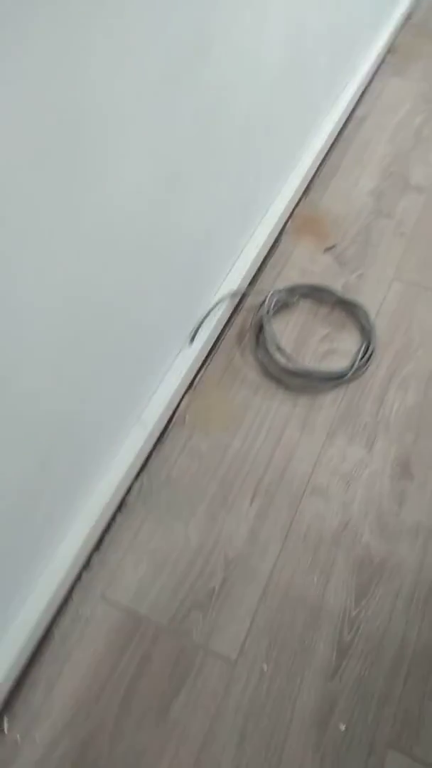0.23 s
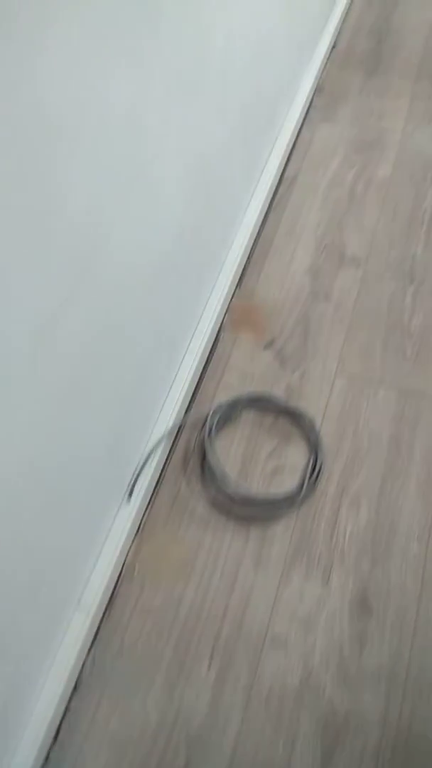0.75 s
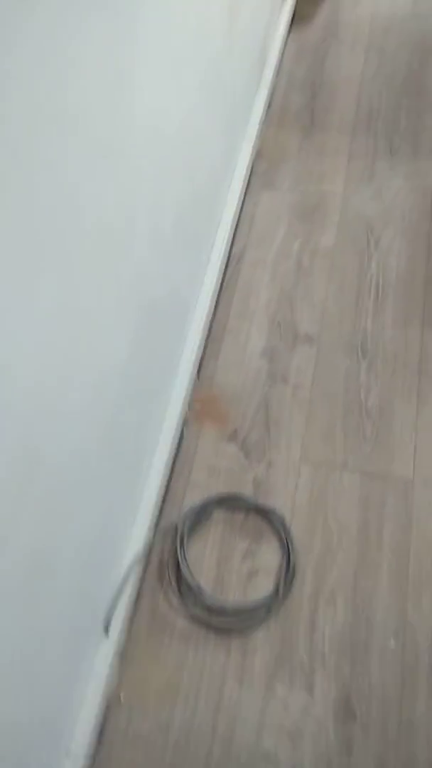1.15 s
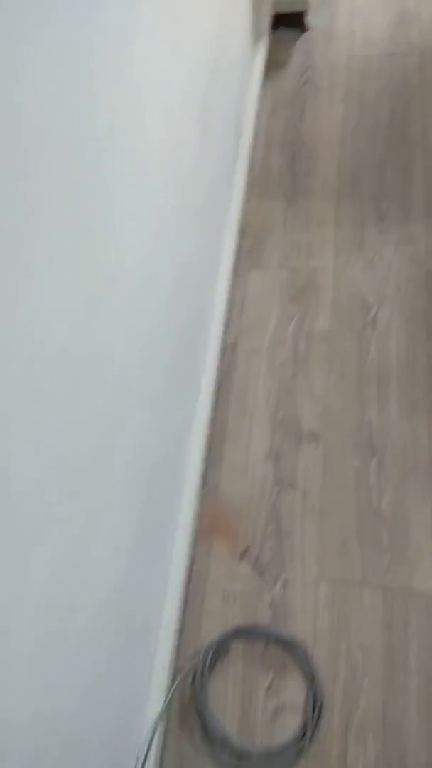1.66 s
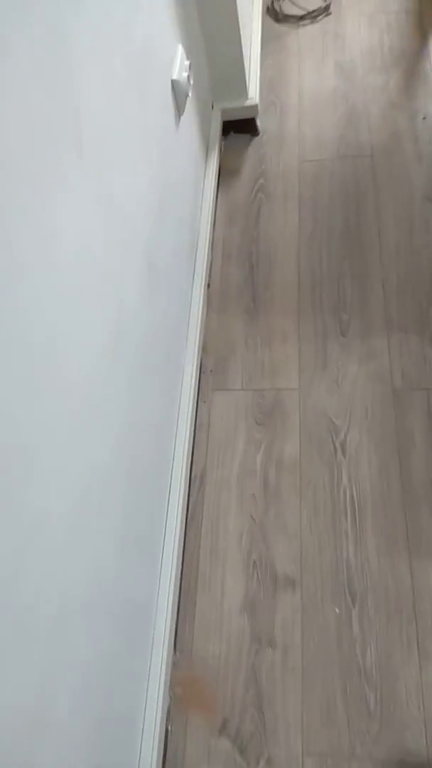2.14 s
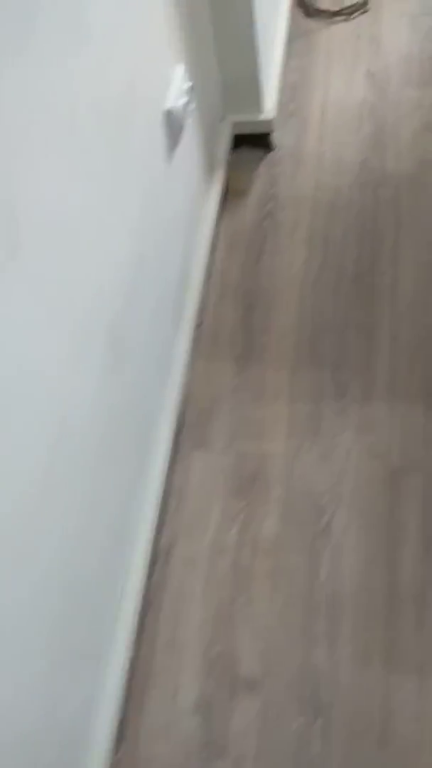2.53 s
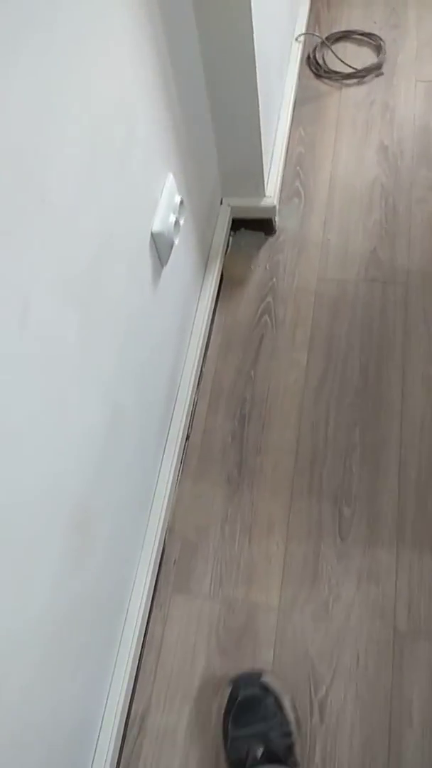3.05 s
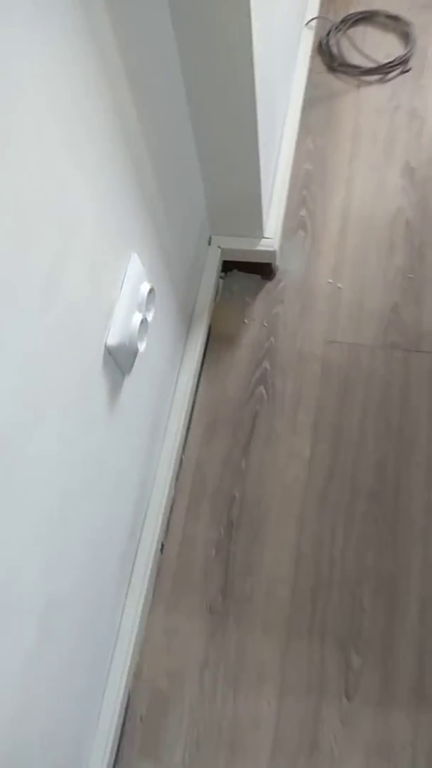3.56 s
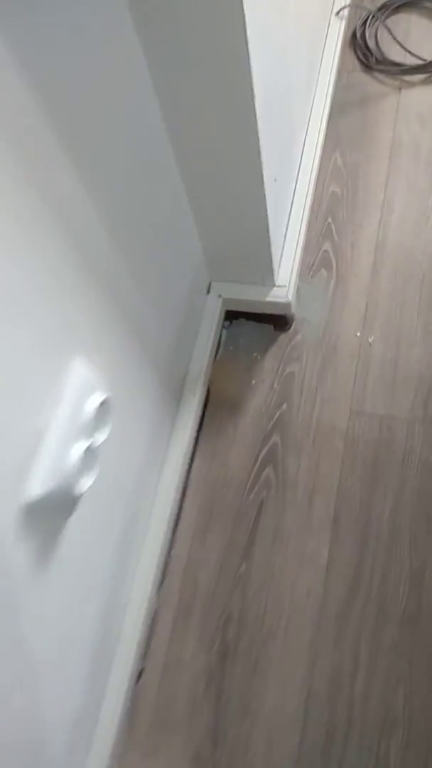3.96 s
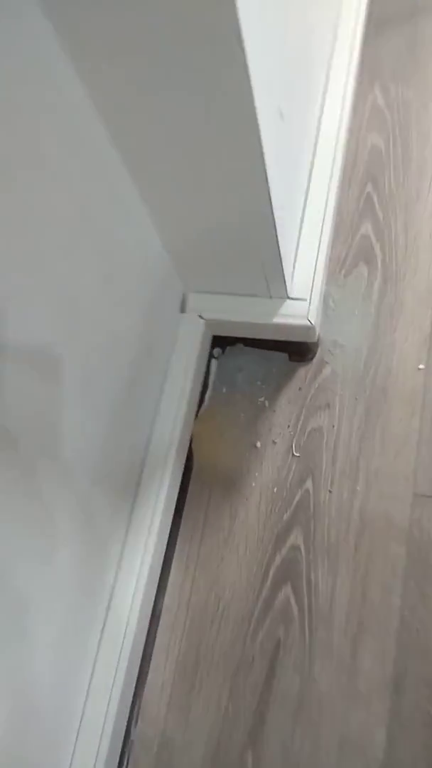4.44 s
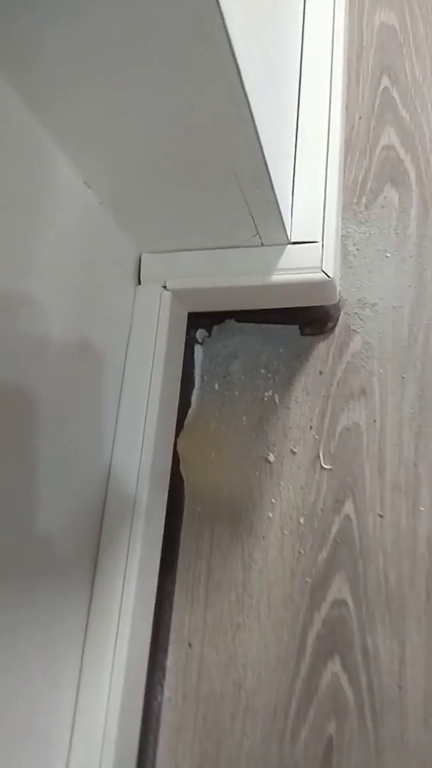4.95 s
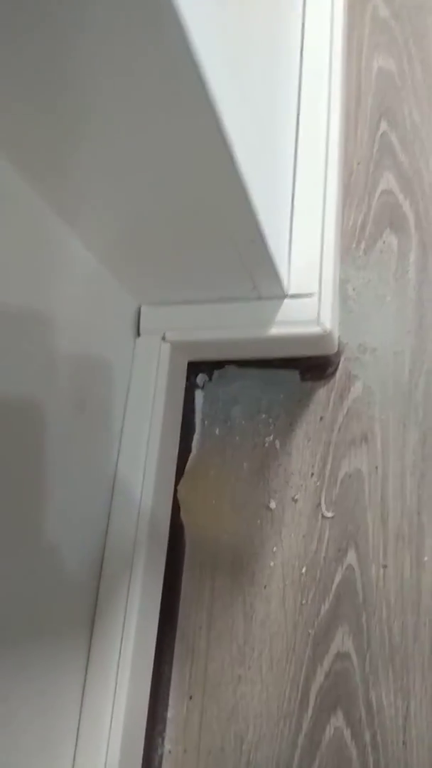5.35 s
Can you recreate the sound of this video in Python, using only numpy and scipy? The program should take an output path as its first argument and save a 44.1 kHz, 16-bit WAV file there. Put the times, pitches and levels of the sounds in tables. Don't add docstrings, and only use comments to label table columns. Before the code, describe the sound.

Slow soft-soled footsteps knock on a hollow laminate floor, with grit snapping underfoot, cloth rustling and a low rumble in a bare room.

```python
import sys
import numpy as np
from scipy import signal
from scipy.fft import rfft, irfft, next_fast_len
from scipy.io import wavfile
from scipy.ndimage import uniform_filter1d

SR = 44100
rng = np.random.default_rng(int(sys.argv[2]) if len(sys.argv) > 2 else 0)


def magnitude_from_level(level_db):
    exponent = np.asarray(level_db, float) / 20
    return 10 ** exponent


def wav_out(sig):
    wavfile.write(sys.argv[1], SR, np.round(np.clip(np.atleast_2d(sig).T, -1, 1) * 32767).astype(np.int16))


N = 246632
TIME = np.arange(N) / SR
PORT_LAG = 12


def on_log(table, hz):
    table_hz, value = np.transpose(table)
    return np.interp(np.log(np.maximum(hz, 1)), np.log(table_hz), value)


def shape(x, gain_at):
    size = next_fast_len(x.shape[-1])
    gain = gain_at(np.fft.rfftfreq(size, 1 / SR))
    return irfft(rfft(x, size) * gain, size)[..., :x.shape[-1]]


def unit(x):
    return x / np.sqrt(np.mean(x ** 2))


def highpass(x, order, hz):
    return signal.sosfilt(signal.butter(order, hz, "high", fs=SR, output="sos"), x)


# pitch_hz, likeness (-1 to 1)
PORT_LIKENESS = [(60, 0.57), (130, 0.98), (290, 0.76), (640, 0.19), (1410, -0.22), (3100, 0.037),
                 (6820, -0.046), (15000, 0.18)]


def diffuse(size):
    def like(hz):
        return np.clip(on_log(PORT_LIKENESS, hz), -.99, .99)
    mid = shape(rng.standard_normal(size), lambda hz: np.sqrt((1 + like(hz)) / 2))
    side = shape(rng.standard_normal(size), lambda hz: np.sqrt((1 - like(hz)) / 2))
    return np.array([mid + side, mid - side])


def coloured(x, table):
    return unit(shape(x, lambda hz: magnitude_from_level(on_log(table, hz))))


def walk(rate_hz):
    hold = int(SR / rate_hz)
    stairs = np.repeat(rng.standard_normal(N // hold + 1), hold)
    return unit(uniform_filter1d(uniform_filter1d(stairs, hold), hold)[:N])


def swell(peak_s, hold_s, rise_db_per_s, fall_db_per_s):
    t = np.arange(N * 1000 // SR + 1) / 1000 - peak_s
    return magnitude_from_level(rise_db_per_s * np.minimum(t, 0) - fall_db_per_s * np.maximum(t - hold_s, 0)) ** 2


def slow(power):
    return np.interp(TIME * 1000, np.arange(len(power)), power)


def patchy(x):
    z = signal.stft(x, nperseg=1024)[2]
    rows, columns = z.shape[-2:]
    field = rng.standard_normal((rows // 3 + 1, columns // 3 + 1))
    field = np.kron(field, np.ones((3, 3)))[:rows, :columns]
    gain = unit(magnitude_from_level(4 * np.minimum(field, 1.6)))
    return signal.istft(z * gain, nperseg=1024)[1][..., :N]


def add(out, x, s, pan_db=0):
    for port, lag, lean in ((0, 0, 0.53), (1, PORT_LAG, -5.3)):
        i = max(int(s * SR) + lag, 0)
        out[port, i:i + len(x)] += magnitude_from_level(lean * pan_db / 2) * x[:N - i]


# start_s, level_db
WEIGHT_LOADS = [
    (.5, -57),
    (1.42, -51),
    (1.7, -53),
    (2.33, -52),
    (3.14, -51),
    (3.85, -53.5),
    (4.33, -44),
]
# pitch_hz, level_db per Hz
BOOM_COLOUR = [(12, -70), (20, -75), (49, -20.5), (80, -25), (97, -17), (118, -10.5), (157, -0.5),
               (293, -6.5), (312, -14), (344, -10), (380, -11.5), (490, -70.5), (840, -120)]


def floor_boom():
    loads = sum(magnitude_from_level(db) ** 2 * swell(s, 0, 81, 68) for s, db in WEIGHT_LOADS)
    level = np.sqrt(slow(loads) + magnitude_from_level(-62) ** 2)
    return level * magnitude_from_level(0.77 * walk(9)) * coloured(diffuse(N), BOOM_COLOUR)


# start_s, level_db
STREET_LEVEL = [(0, -60), (.6, -66.5), (2.0, -67.5), (3.0, -67), (4.1, -72), (4.35, -84), (4.6, -65.5),
                (5.59, -69.5)]
# pitch_hz, level_db per Hz
STREET_COLOUR = [(180, -43.5), (300, 1.5), (370, -4.5), (398, 1), (429, -2.5), (651, -5), (715, -4.5),
                 (1500, -20), (1950, -52), (3300, -120)]


def street():
    level_db = np.interp(TIME, *np.transpose(STREET_LEVEL)) + 0.33 * walk(10)
    return magnitude_from_level(level_db) * coloured(diffuse(N), STREET_COLOUR)


# start_s, pitch_hz, level_db
DRONE_SPELLS = [
    [(1.7, 215, -76), (1.85, 212, -49), (2.0, 205, -61)],
    [(3.0, 172, -53), (3.15, 172, -53), (3.45, 170, -56), (3.7, 170, -56), (3.8, 170, -75)],
    [(3.85, 112, -87), (3.95, 108, -63), (4.1, 108, -61), (4.2, 112, -85)],
]


def drone():
    out = np.zeros(N)
    for spell in DRONE_SPELLS:
        s, hz, db = np.transpose(spell)
        pitch_hz = np.interp(TIME, s, hz) * (1 + 0.00915 * walk(10))
        level_db = np.interp(TIME, s, db, -200, -200) + 0.41 * walk(11)
        out += magnitude_from_level(level_db) * np.sin(2 * np.pi * np.cumsum(pitch_hz) / SR)
    return out


# pitch_hz, level_db per Hz
HISS_COLOUR = [(710, -9.5), (1200, -3), (1350, -67), (2370, -20.5), (6150, -15), (7410, -21.5), (10400, -3),
               (15100, -15), (16500, 2.5)]


def microphone_hiss():
    hush_db = -8 * np.exp(-((TIME - 5.22) / 0.067) ** 2)
    return magnitude_from_level(-57.5 + hush_db) * patchy(coloured(diffuse(N), HISS_COLOUR))


# start_s, level_db (peak), hold_ms, dullness_db
BRUSHES = [(0.0264, -28, 13.5, -15), (0.333, -25, 35, 1.5), (0.4094, -32.5, 15, 0), (0.5594, -36, 39, -21),
           (1.3753, -32, 6.9, 2), (1.4266, -23.5, 6.4, 0.5), (1.565, -32, 17, -10), (1.6714, -26, 30.4, -5),
           (2.192, -31, 28, 7.5), (2.486, -35.5, 27, 4.5), (2.9725, -33, 21, 5.5), (3.08, -28.5, 22, -16),
           (3.135, -25, 15, -1), (3.696, -29, 32, -26), (3.9035, -31, 21, 1), (4.2178, -21.5, 29, -0.5)]


def brushing():
    bright, dull, ms = np.zeros(N), np.zeros(N), TIME[:SR // 8] * 1000
    for s, db, hold_ms, dull_db in BRUSHES:
        flare = (1 - np.exp(-ms / 1.13)) ** 2 * np.exp(-(ms / hold_ms) ** 2.2)
        at = slice(int(s * SR), int(s * SR) + len(ms))
        bright[at] += magnitude_from_level(db - 8.5) ** 2 * flare
        dull[at] += magnitude_from_level(db - 19 + dull_db) ** 2 * flare
    return bright, dull


def fibres(density_hz, spread_db):
    slipping = rng.random(N) < density_hz / SR
    size = magnitude_from_level(spread_db * rng.exponential(size=N))
    return unit(slipping * size * rng.standard_normal(N)) + 1.3 * rng.standard_normal(N)


# start_s (full rustle), level_db, swell_s, hold_s, scuff_db (minus rustle)
ROLLS = [(0.001, -44, .05, 0.025, 2), (0.385, -45, .06, 0.13, -17), (0.545, -53, 0.12, 0.14, -5),
         (1.361, -43.5, 0.037, 0.19, -6), (1.728, -49, 0.039, 0.039, -3), (2.242, -42, 0.17, 0.087, -11),
         (2.332, -40, 0.038, 0.026, -7), (3.021, -50.5, 0.041, 0.046, -1.5), (3.138, -41, 0.18, 0.03, -9.5),
         (3.186, -55, 0.13, 0.031, -11), (3.59, -53, 0.24, 0.015, -3), (3.796, -42.5, 0.12, 0.069, -9.5),
         (4.187, -50, 1, 0.11, -1.5), (4.265, -42.5, .2, 0.089, -4.5), (4.587, -53, 0.9, 0.17, -11)]
# start_s, level_db, scuff_db (minus rustle)
SLEEVE_LEVEL = [(0, -53, -15), (.75, -65.5, 3.5), (1.0, -56.5, -6.5), (1.3, -61.5, -3), (1.9, -62.5, 0),
                (2.1, -57.5, -1), (2.8, -62.5, -7.5), (3.5, -65.5, -3), (4.4, -58.5, -2), (4.88, -58, -14),
                (5.0, -61.5, -13), (5.1, -74, -22), (5.219, -92, -10), (5.4, -76, -25), (5.59, -69.5, -18)]
# pitch_hz, level_db per Hz
CLOTH_COLOUR = [(2350, -13.5), (4000, -6.5), (4920, -5), (5510, -6.5), (7370, -4), (10800, -2),
                (15100, -12), (16200, -40.5), (16500, -54)]
RUBBER_COLOUR = [(530, -3.5), (900, -5.5), (1450, -5.5), (2430, -7), (2610, -4), (3280, -4), (4000, -9.5),
                 (6000, -5.5), (7800, -35), (13200, -120)]
BRUSH_COLOUR = [(1760, -76), (3000, -9), (6210, -4), (9940, 2.5), (12700, -0.5), (15500, -8.5),
                (16200, -37), (16500, -37)]


def rubbing():
    shapes = np.array([swell(s, hold_s, 20 / swell_s, 94.5) for s, _, swell_s, hold_s, _ in ROLLS])
    _, db, _, _, scuff_db = np.transpose(ROLLS)
    legs = slow(magnitude_from_level(db) ** 2 @ shapes)
    leg_scuff = slow(magnitude_from_level(db + scuff_db) ** 2 @ shapes)
    times, *columns = np.transpose(SLEEVE_LEVEL)
    sleeve, sleeve_scuff = (magnitude_from_level(np.interp(TIME, times, column)) ** 2 for column in columns)
    brush, brush_scuff = brushing()

    cloth = (legs + sleeve) * magnitude_from_level(1.3 * walk(30) + 1.5 * walk(120)) ** 2
    scuff = (leg_scuff + sleeve * sleeve_scuff) * magnitude_from_level(1.65 * walk(20)) ** 2 + brush_scuff
    pan_db = (3.5 * legs + 7.5 * sleeve) / (legs + sleeve)
    lean = magnitude_from_level(np.outer([.5, -.5], pan_db - 3.5))
    out = np.zeros((2, N))
    for power, colour in ((cloth, CLOTH_COLOUR), (scuff, RUBBER_COLOUR), (brush, BRUSH_COLOUR)):
        near = coloured(fibres(6000, 1.5), colour)
        ports = 0.16 * np.array([near, np.roll(near, PORT_LAG)])
        ports = ports + 0.79 * coloured(diffuse(N), colour)
        out += np.sqrt(power) * lean * patchy(ports)
    return highpass(out, 2, 350)


# start_s, level_db (peak), pitch_hz, pan_db (left minus right)
GRIT = [(0.0874, -29.5, 10000, -2), (0.5, -30, 10500, 10), (0.6666, -30.5, 10500, 3),
        (1.3243, -28, 9700, 3.5), (1.432, -28, 4200, 4), (1.414, -22.5, 8000, -1), (1.462, -34, 9850, 0),
        (2.2613, -16.5, 6300, 4), (2.3277, -22, 9600, -6), (2.4863, -29, 8750, 7), (2.972, -30, 10600, 9),
        (3.04, -37, 10100, -8), (3.0595, -21, 9200, -3.5), (3.8412, -31, 11000, 12),
        (4.2645, -29, 6830, -5), (4.335, -27, 13400, -3), (4.348, -33, 10400, 11), (4.439, -27, 11000, 4),
        (4.4986, -19.5, 8640, -2), (4.5794, -34, 12800, 2), (4.8088, -28.5, 10700, -6)]
# start_s, level_db (peak), pitch_hz, pan_db
LARGE_STONES = [
    (1.8579, -24.5, 5700, -4.5),
    (2.102, -38, 8800, -6),
    (3.137, -27, 8300, 5.5),
    (3.6076, -26.5, 6230, -5),
    (4.7612, -26.5, 8600, -5),
    (5.5616, -32, 11200, 8),
]
# start_s, level_db (peak), pan_db
HANDLING_TICKS = [(0.4349, -35, 9), (0.661, -35.5, 12), (1.0214, -51, 1), (1.1197, -35, 3), (1.7694, -47, -1),
                  (2.0764, -35, -2), (2.1765, -42, 5), (3.585, -40, -8), (3.7654, -39, 5), (3.8134, -33, 10),
                  (4.4197, -34.5, 18), (5.308, -57, 15), (5.347, -52, 19), (5.3646, -55, 16),
                  (5.4983, -49, 17)]


def snaps():
    out, t = np.zeros((2, N)), TIME[:SR // 16]
    grains = [(*row, 9.9, -32.5) for row in GRIT]
    grains += [(*row, 10.3, -13.5) for row in LARGE_STONES]
    grains += [(s, db, 11000, pan_db, 11, -11.5) for s, db, pan_db in HANDLING_TICKS]
    sole_band = signal.butter(2, [2500, 5500], "band", fs=SR, output="sos")
    for s, db, hz, pan_db, t60_ms, sole_db in grains:
        burst = rng.standard_normal(len(t)) * 1000. ** (-t * 1000 / t60_ms)
        burst[4] += 3.5
        wide = highpass(burst, 2, 5500)
        tone = signal.lfilter(*signal.iirpeak(hz, 4.0, fs=SR), burst)
        sole = signal.sosfilt(sole_band, burst)
        crack = 0.47 * wide + 4.4 * tone + magnitude_from_level(sole_db + 7) * sole
        add(out, magnitude_from_level(db) * crack / np.abs(crack).max(), s, pan_db + 6.0)
    return out


def ring(modes, scatter, t):
    hz, db, t60_s = np.transpose(modes)[:, :, None]
    scatter = scatter[:len(modes)]
    hz = hz * (1 + 0.029 * scatter[:, :1])
    level = magnitude_from_level(db + 4.4 * scatter[:, 1:])
    return (level * np.sin(2 * np.pi * hz * t) * 1000. ** (-t / t60_s)).sum(axis=0)


def peak(x):
    return x / np.abs(x).max()


# start_s, level_db (knock), thump_db (minus knock), slap_hz, slap_db
HEEL_TOE_BLOWS = [(0.3337, -22.5, -8.5, 780, 2), (.409, -39.5, -0.5, 610, 3.5), (.665, -50.5, -15, 760, 8),
                  (1.3425, -39, -14, 610, 9.5), (1.423, -39.5, -3.5, 690, 7), (1.672, -49, -9.5, 484, -26),
                  (2.182, -22.5, -11.5, 622, -1), (2.351, -41, -5, 533, -12),
                  (2.9702, -26.5, -8.5, 670, -0.5), (3.132, -40.5, -7, 760, 7), (3.697, -39, -7.5, 597, 3),
                  (3.779, -49, 1, 496, -2), (3.903, -49, -18, 880, 8), (4.2185, -32, 7, 304, 1.5),
                  (4.265, -37, -9, 505, -14), (4.3358, -39.5, -4.5, 605, 10.5)]
# pitch_hz, level_db, t60_s
DEEP_BOARDS = [(138, -43, 0.11), (157.6, 1.5, 0.085), (172, -14.5, 0.32), (220, 5.5, 0.031),
               (270, -44, 0.085)]
HIGH_BOARDS = [(356, -10, 0.076), (439, 17.5, 0.047), (520, 14.5, 0.13), (592, 23.5, 0.093), (704, 7, 0.11),
               (780, -1.5, 0.022), (893, 3, 0.065), (1100, -27, 0.033), (1370, 9, .03), (1770, 11, 0.0254)]


def blows():
    out, t = np.zeros((2, N)), TIME[:SR // 2]
    for s, db, thump_db, slap_hz, slap_db in HEEL_TOE_BLOWS:
        scatter = rng.standard_normal((20, 2))
        width_s = 0.48 / slap_hz
        push = -np.sin(np.pi * np.clip(t / width_s, 0, 1))[:int(width_s * SR) + 2] ** 2
        knock = np.convolve(ring(HIGH_BOARDS, scatter[10:], t), push)[:len(t)]
        thump = np.convolve(ring(DEEP_BOARDS, scatter, t), push)[:len(t)]
        swings = t * slap_hz
        wobble = np.sin(2 * np.pi * swings) + 0.15 * np.sin(2 * np.pi * 2.73 * swings)
        slap = -swings * np.exp(-swings / 0.5) * wobble
        blow = magnitude_from_level(-3.0) * peak(knock) + magnitude_from_level(thump_db + 4.5) * peak(thump) + magnitude_from_level(slap_db) * peak(slap)
        add(out, magnitude_from_level(db) * blow, s, 1.5)
    return out


# pitch_hz, t60_s, level_db
WALL_ECHO = [(128, 1, -6.5), (250, 0.37, 3.5), (533, 0.41, -10), (960, 0.39, -6.5), (2040, 0.99, -5.5),
             (4300, 0.14, -3.5), (7960, 0.51, -9.5), (14000, 0.16, -10)]


def corridor(x):
    t, noise, tail = TIME[:SR], diffuse(SR), np.zeros((2, SR))
    for hz, t60_s, db in WALL_ECHO:
        band = shape(noise, lambda f: np.exp(-(np.log2(np.maximum(f, 1) / hz) / 0.72) ** 2))
        tail += magnitude_from_level(db) * band * 1000. ** (-t / t60_s) / np.sqrt(t60_s * SR / 14)
    tail = tail * np.clip(t * 1000 / 4 - .5, 0, 1)
    return signal.fftconvolve(x[:1], tail, axes=1)[:, :N]


def scene():
    heels, grit = blows(), snaps()
    steps = heels + grit + corridor(heels + magnitude_from_level(-1.5) * grit)
    steps = highpass(steps, 4, 115) + magnitude_from_level(-16.5) * steps
    background = floor_boom() + street() + drone() + microphone_hiss()
    return steps + rubbing() + background


# pitch_hz, pan_db (left minus right)
PORT_BALANCE = [(60, -16), (110, -3), (200, 1), (380, -1), (700, 0.5), (1290, 0), (2380, 2), (4400, 1),
                (8120, 1.5), (15000, 15.5)]


def hand_shade(x):
    def gain(hz):
        return magnitude_from_level(np.outer([.5, -.5], on_log(PORT_BALANCE, np.maximum(hz, 150))))
    return shape(x, gain)


def dropouts(x):
    share, lo_hz, hi_hz, mute_db, shift = .07, 2500, 7500, -50, 21
    frame = dict(window="cosine", nperseg=2048)
    hz, _, z = signal.stft(np.pad(x, ((0, 0), (shift, 0))), SR, **frame)
    rows, frames = z.shape[-2:]
    draw = np.kron(rng.random((rows // 14 + 1, frames)), np.ones((14, 1)))[:rows]
    power = np.mean(np.abs(z) ** 2, axis=(0, 1))
    steady = power < 1.5 * uniform_filter1d(power, size=5)
    likely = np.where(hz < hi_hz, share, share / 4)[:, None] * (hz > lo_hz)[:, None]
    muted = (draw < likely) | np.roll(draw < likely, 1, axis=1)
    muted = (muted | np.roll(draw < .4 * likely, 2, axis=1)) & steady
    return signal.istft(z * np.where(muted, magnitude_from_level(mute_db), 1), **frame)[1][:, shift:shift + N]


def low_pass(x):
    return signal.sosfilt(signal.butter(12, 17030, fs=SR, output="sos"), x)


def record(dry):
    ports = hand_shade(dry)
    ports = signal.sosfilt(signal.ellip(8, .2, 45, 15950, fs=SR, output="sos"), ports)
    return low_pass(dropouts(ports))


dry = scene()
out = record(dry)
wav_out(out)
```